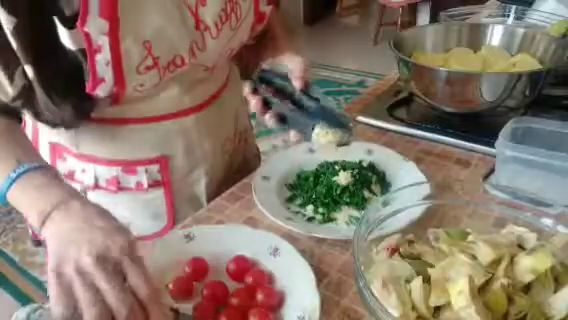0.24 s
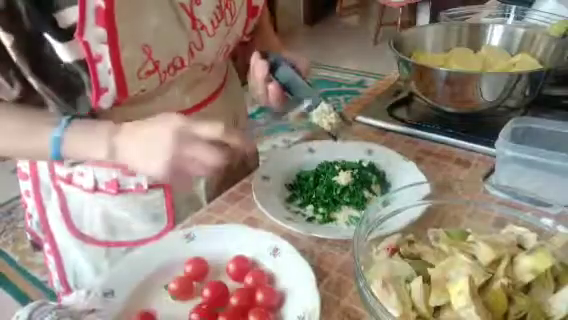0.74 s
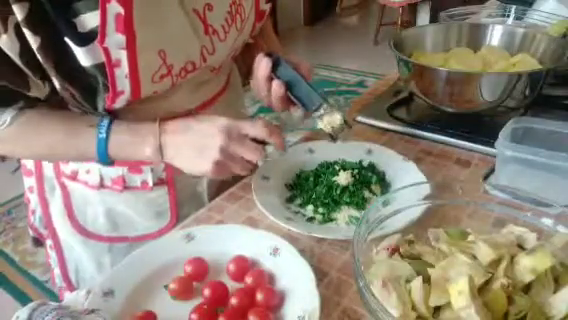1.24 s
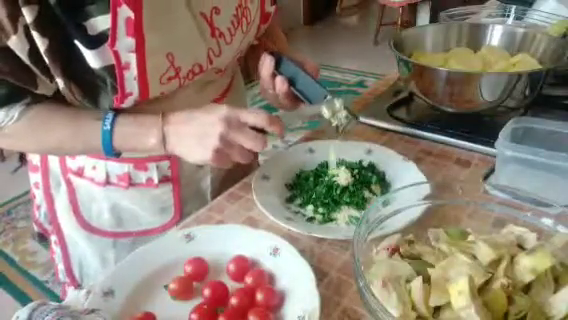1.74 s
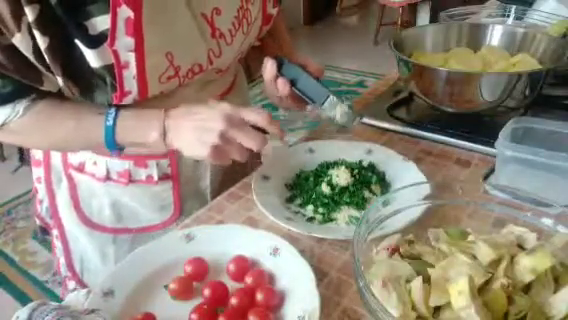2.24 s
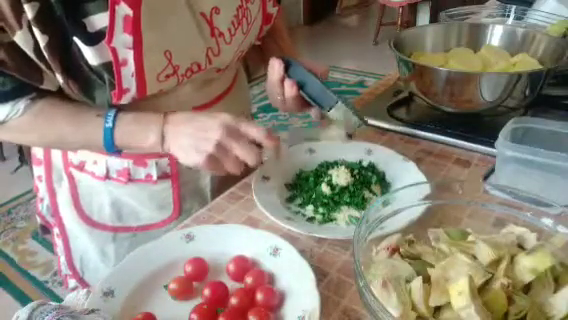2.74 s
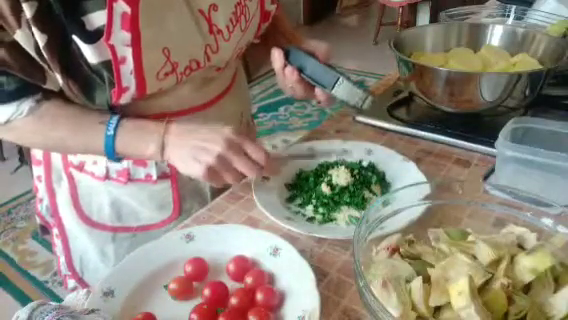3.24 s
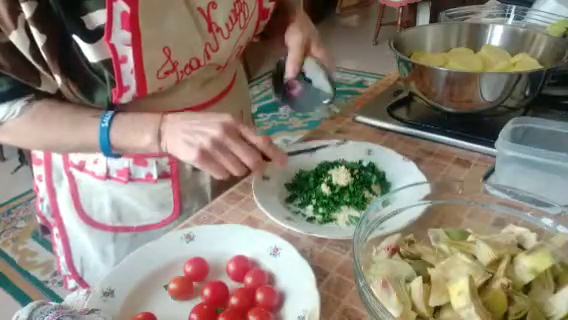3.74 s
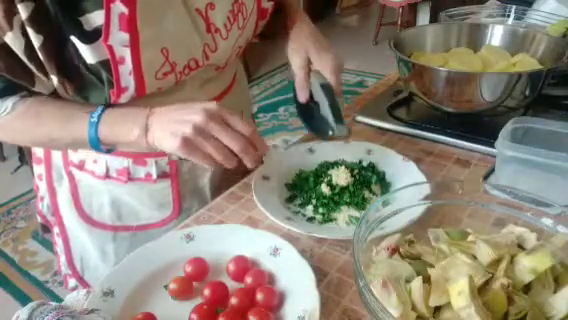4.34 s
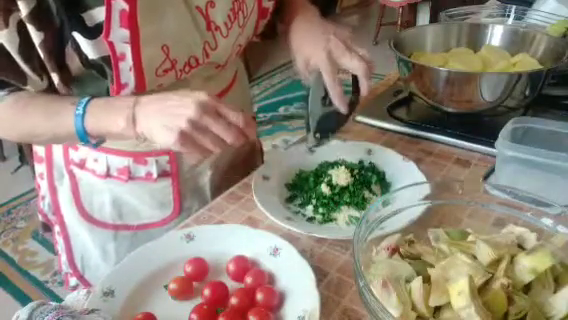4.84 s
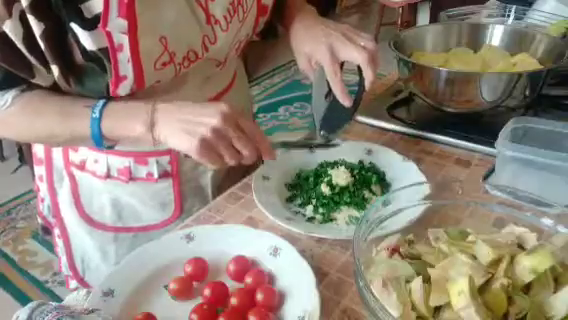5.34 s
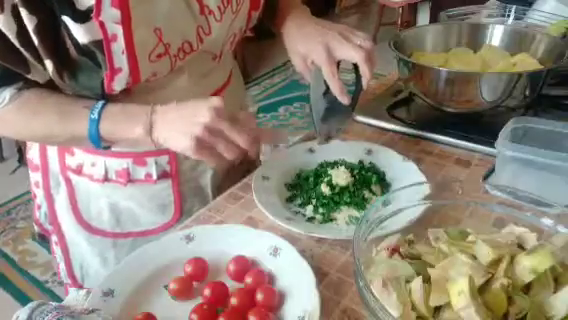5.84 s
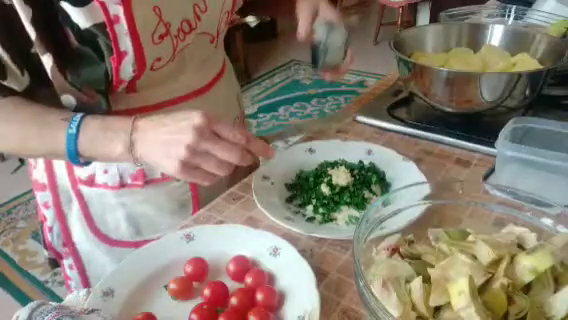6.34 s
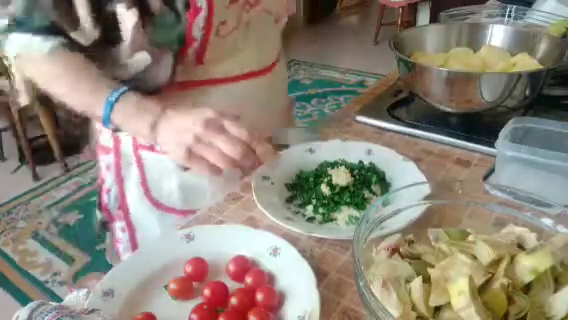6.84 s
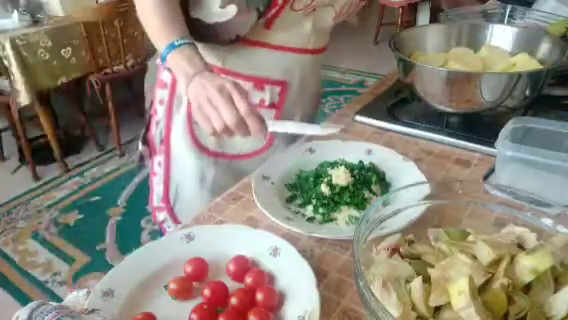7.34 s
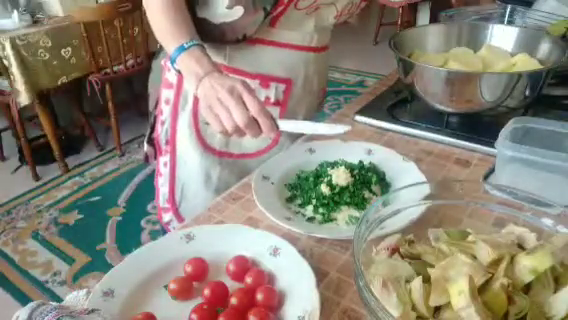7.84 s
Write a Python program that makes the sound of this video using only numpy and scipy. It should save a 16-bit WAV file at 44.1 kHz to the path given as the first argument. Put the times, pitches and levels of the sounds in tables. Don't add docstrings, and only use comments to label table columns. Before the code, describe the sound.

In a quiet tiled kitchen, a knife handle rattles briefly on a ceramic plate. The blade then scrapes a metal garlic press in short gritty strokes with crisp snaps. After a pause come louder, uneven metallic taps, a last scrape, a soft step and a hollow cupboard-like thud with small rebounds. Close stereo microphones, faint low rumble behind.

```python
import sys
import numpy as np
from scipy import signal
from scipy.fft import rfft, irfft, next_fast_len
from scipy.io import wavfile
from scipy.ndimage import uniform_filter1d

SR = 44100
rng = np.random.default_rng(int(sys.argv[2]) if len(sys.argv) > 2 else 0)


def pcm_store(signal):
    levels = np.round(np.clip(np.atleast_2d(signal), -1, 1) * 32767)
    wavfile.write(sys.argv[1], SR, levels.astype(np.int16).T)


def level_to_linear(level):
    exponent = np.asarray(level, float) / 20
    return 10 ** exponent


N = 357210


def evened(x):
    return x / np.sqrt(np.mean(x ** 2) + 1e-20)


def read(points, hz):
    f, value = np.transpose(points)
    return np.interp(np.log(hz + 1), np.log(f + 1), value)


def add(mix, s, sound):
    part = mix[:, round(s * SR):][:, :sound.shape[1]]
    part += sound[:, :part.shape[1]]


def causal(points, size=2048):
    hz = abs(np.fft.fftfreq(size, 1 / SR))
    log_gain = np.log(level_to_linear(np.maximum(read(points, hz), -90)))
    taps = np.fft.ifft(np.exp(np.conj(signal.hilbert(log_gain)))).real
    return taps[:size // 2] / np.linalg.norm(taps)


def ports(x, likeness):
    z = rfft(x)
    same = np.clip(read(likeness, np.fft.rfftfreq(x.shape[1], 1 / SR)), -1, 1)
    right = same * z[0] + np.sqrt(1 - same ** 2) * z[1]
    return irfft([z[0], right], x.shape[1])


# pitch in Hz, likeness from -1 to 1.
BLOW_LIKENESS = [(60, 1), (180, 0.95), (550, 0.56), (1650, -0.063), (4970, -0.047), (15000, 0.033)]


def tilted(x, db_per_octave, centre_hz):
    size = next_fast_len(x.shape[1] + 512)
    hz = np.maximum(np.fft.rfftfreq(size, 1 / SR), centre_hz / 8)
    leaned = irfft(rfft(x, size) * level_to_linear(db_per_octave * np.log2(hz / centre_hz)), size)
    fade = np.clip(np.arange(size)[::-1] / 512 - 1, 0, 1)
    return ports(leaned, BLOW_LIKENESS) * fade


def rings(modes, local, scatter):
    hz, db, t60 = np.tile(np.transpose(modes), 3)[:, :, None]
    t = np.arange(max(round(t60.max() * SR), 1024)) / SR
    hz = hz * (1 + scatter * local.standard_normal(hz.shape))
    strength = level_to_linear(db.T + 2 * local.standard_normal((2, len(hz))))
    start = strength * np.exp(2j * np.pi * local.random((2, len(hz))))
    decaying_tones = np.exp((2j * np.pi * hz - np.log(1000) / t60) * t)
    out = (start @ decaying_tones).real
    out *= 1 - np.exp(-(t * hz.max() / 1.5) ** 2)
    return out / np.linalg.norm(out[0])


def blows(rows, colour, low, high, scatter, rise, centre_hz):
    out, crack = np.zeros((2, N)), causal(colour)
    for (s, db, tilt_db, low_db, high_db, ms), seed in zip(rows, rng.integers(0, 2 ** 31, 64)):
        local = np.random.default_rng(seed)
        t = np.arange(2000) / SR * 1000 / max(ms, .1)
        chatter = local.standard_normal((2, len(t))) * np.exp(-t) * np.minimum(t / max(rise, .01), 1)
        chatter[:, np.argmax(t > rise)] = 1.7
        low_ring = level_to_linear(low_db) * rings(low, local, scatter)
        high_ring = level_to_linear(high_db) * rings(high, local, scatter)
        parts = crack[None], low_ring, high_ring
        body = np.zeros((2, max(part.shape[1] for part in parts)))
        for part in parts:
            add(body, 0, part)
        sound = tilted(signal.fftconvolve(chatter, body, axes=1), tilt_db, centre_hz)
        add(out, s, level_to_linear(db) * 1.56 * sound / abs(sound).max())
    return out


# time in seconds, level in dB.
BUSTLE = [(0.0, 7), (.4, 3.5), (.8, 3), (2.3, 2.5), (2.68, 6), (2.95, 1.5), (3.45, -0.7), (4.3, 1),
          (4.67, -2), (5.03, 1.2), (5.4, -2.5), (5.91, -4.5), (6.3, -1), (7.24, -3.5), (7.6, 2), (8.1, 3.5)]
# pitch in Hz, level in dB per Hz.
WASH_COLOUR = [(150, -31), (250, -6.5), (454, -4), (768, -6), (2240, -12), (6070, -13), (7760, -10.5),
               (11800, -13.5), (15100, -13.5), (16500, -28.5)]
# pitch in Hz, level in dB per Hz.
RUMBLE_COLOUR = [(8.8, -30), (15, 3.5), (27, -4), (48, -5.5), (75, -15), (107, -10.5), (135, -19),
                 (260, -23), (340, -54), (570, -120)]
# pitch in Hz, level in dB.
FRIDGE_HUM = [(102, -64.5)]
# pitch in Hz, likeness from -1 to 1.
NOISE_LIKENESS = [(60, 0.92), (180, 0.79), (550, 0.25), (1650, 0.034), (4970, 0.041), (15000, -0.066)]
RUMBLE_DB, WASH_DB, HISS_DB = -59.5, -75, -70
WASH_FOLLOWS, HISS_FOLLOWS = 0.48, .1
HUM_FADE_DB_PER_S = 1.7


def quiet():
    hop = 512
    frames, hz = N // hop + 5, np.fft.rfftfreq(2048, 1 / SR)
    a, b, c, d, patches = rng.standard_normal((frames, len(hz), 5)).T
    patches = uniform_filter1d(patches, size=12, axis=0)
    patches = evened(uniform_filter1d(patches, size=6, axis=1))
    bustle = np.interp(np.arange(frames) * hop / SR, *np.transpose(BUSTLE))
    rumble = RUMBLE_DB + bustle
    wash = WASH_DB + WASH_FOLLOWS * bustle
    hiss = HISS_DB + HISS_FOLLOWS * bustle
    high = 1 / (1 + np.exp(-4 * (np.log2(hz + 1)[:, None] - 11.3)))
    upper = level_to_linear(read(WASH_COLOUR, hz)[:, None] + (1 - high) * (wash + 4) + high * hiss - 10.5)
    lower = level_to_linear(read(RUMBLE_COLOUR, hz)[:, None] + rumble + 1.5)
    z = np.array([a + 1j * b, c + 1j * d]) * np.hypot(upper, lower) * level_to_linear(1.8 * patches)
    floor = signal.istft(z, nperseg=2048, noverlap=1536)[1][:, :N]
    waver = evened(np.interp(np.arange(N) / N, np.linspace(0, 1, 50), rng.standard_normal(50)))
    hum = np.zeros(N)
    for f, db in FRIDGE_HUM:
        level = level_to_linear(db + 3.5 * waver - HUM_FADE_DB_PER_S * np.arange(N) / SR)
        hum += level * np.sin(2 * np.pi * np.cumsum(f + 2.5 * waver) / SR)
    return ports(floor, NOISE_LIKENESS) + hum


# pitch in Hz, level in dB, time to die away by 60 dB in seconds.
PRESS_LOW_RING = [(595, -21, .035), (1600, -9, 0.025), (2180, -4.5, 0.04), (2870, 3.5, 0.028),
                  (3403, 2, 0.025), (3624, -3.5, .03), (4060, 0, 0.03)]
PRESS_HIGH_RING = [(5630, -0.5, 0.022), (6420, 2, 0.024), (6870, -2.5, 0.028), (7604, 6, 0.03),
                   (8030, -5, 0.043), (8685, 4, 0.038), (10730, -5.5, 0.043), (11730, -2, 0.024)]
# pitch in Hz, level in dB per Hz.
SCRAPE_COLOUR = [(180, -67), (300, -28), (1190, -17.5), (1930, -6.5), (2130, -11.5), (3300, -6.5),
                 (3970, -5.5), (7500, 2), (13000, -8), (15700, -22), (16500, -47.5)]
# moment of top speed
# in seconds, friction level in dB, speed-up in seconds, slow-down in seconds, brightness in dB per octave.
BLADE_STROKES = [(1.029, -54, .035, .04, -3.2), (1.132, -54.5, 0.083, .15, 2.5),
                 (1.276, -51, .045, 0.026, 7), (1.53, -45, 0.14, .045, 6.5),
                 (1.805, -29, 0.047, 0.059, 0.1), (2.083, -23.5, .022, 0.046, 0),
                 (2.306, -26.5, .011, 0.033, -2.5), (2.547, -23.5, 0.028, .027, -1),
                 (2.741, -27.5, 0.023, 0.075, -2.5), (4.372, -52, 0.094, 0.16, 3),
                 (6.077, -18, 0.014, 0.033, 3), (7.206, -48.5, 0.036, .1, -2.5),
                 (7.61, -55.5, .13, .33, -6.5), (4.438, -43.5, .02, .026, -1.2),
                 (6.1, -30.5, .03, .09, 0.5), (.14, -64, .35, 0.54, 0), (6.45, -64, .4, 0.47, 0),
                 (7.88, -61.5, 0.46, .5, -2)]
STROKE_SWING_DB = 25.5


def strokes():
    out, hiss = np.zeros((2, N)), causal(SCRAPE_COLOUR)
    for (top, db, rise, fall, tilt_db), seed in zip(BLADE_STROKES, rng.integers(0, 2 ** 31, 32)):
        local = np.random.default_rng(seed)
        s = max(top - rise, 0), top, top + fall
        t = np.arange(s[0], s[-1], 1 / SR)
        clumps = level_to_linear(0.92 * evened(uniform_filter1d(local.standard_normal(len(t)), 90)))
        sizes = level_to_linear(2.1 * np.minimum(local.exponential(1, len(t)), 4))
        slips = sizes * (local.random(len(t)) < 12000 / SR)
        drive = evened(clumps * slips) * local.standard_normal((2, len(t)))
        speed_db = db - STROKE_SWING_DB * np.interp(t, s, [1, 0, 1])
        drive *= level_to_linear(speed_db) * signal.windows.tukey(len(t), .15)
        body = level_to_linear(-10.5) * rings(np.vstack([PRESS_HIGH_RING, PRESS_LOW_RING]), local, 0.029)
        body[:, :len(hiss)] += hiss
        sound = signal.fftconvolve(drive, body / np.linalg.norm(body[0]), axes=1)
        add(out, s[0], tilted(sound, tilt_db, 7000))
    return out


# time in seconds, peak level in dB, ring strength in dB.
RIM_CLINKS = [
    (0.285, -25, 3),
    (0.307, -31, 4),
    (0.331, -27.5, -0.5),
    (0.34, -28.5, -2),
    (0.382, -33, -1.5),
    (0.77, -54.5, -7),
    (0.89, -54, -2.2),
]
# pitch in Hz, level in dB, time to die away by 60 dB in seconds.
PLATE_RING = [(563, -3.5, 0.062), (609, 3.5, 0.064), (699, -2, 0.067), (808, 0, 0.089), (900, -9, 0.059),
              (1290, -14, 0.089), (1430, -3, 0.059)]
BLADE_RING = [(2143, -1, 0.12), (3160, 0, 0.094), (3830, -8, 0.066), (4220, -4.5, 0.067),
              (5150, -11.5, 0.06), (5740, -12, .05), (6900, -13, .04)]
# pitch in Hz, level in dB per Hz.
CLINK_COLOUR = [(120, -48), (200, -17.5), (671, 3), (2610, -10), (4270, -18), (7010, -16), (8900, -48),
                (10100, -27), (16000, -88)]
PLATE_DB, BLADE_DB, CLINK_MS = 8, 2.5, 3.26
CLINK_LEAN_DB = 0.32


def clinks():
    rows = [(s, db, CLINK_LEAN_DB * ring, PLATE_DB + ring, BLADE_DB + ring / 2, CLINK_MS)
            for s, db, ring in RIM_CLINKS]
    return blows(rows, CLINK_COLOUR, PLATE_RING, BLADE_RING, 0.0059, 0.3, 1500)


# time in seconds, peak level in dB, lean in dB per octave
# (flat blow down, edge blow up), shift of the ring towards high tones in dB.
PRESS_TAPS = [(0.9177, -40, -4.5, 1), (1.471, -37.5, -2.4, -8), (1.737, -26.5, -1.5, -3),
              (2.0203, -37, -1.1, -2), (2.0251, -25, -1.5, 0), (2.2837, -30, -1.5, -2),
              (2.4825, -19, -0.1, 4.5), (2.7036, -19, -1.1, 0.5), (2.7453, -12, 0.8, 1.7),
              (4.182, -14.5, -.9, -1.2), (4.36, -42.5, 1.5, -4), (4.376, -36.5, 3, 10),
              (4.4344, -33.5, -1.1, -3.5), (4.9215, -8, -.7, -1.5), (4.985, -21.5, 0.5, -3),
              (5.3496, -11.5, 2.9, 0.3), (5.3548, -13.5, -0.9, -1.7), (5.408, -13, 1.5, 1.2),
              (5.5356, -5, -0.5, 0.5), (5.7034, -10, -2, -4.5), (5.877, -10, -1.3, 0),
              (5.905, -18, 3, -1.3), (6.0502, -7, 2, 3), (6.0764, -11, 1.5, 4.5), (6.118, -13, 1.9, 3.5)]
# time in seconds, peak level in dB, lean in dB per octave, shift towards high tones in dB.
RIDGE_SNAPS = [
    (1.8021, -22.5, 6, -9),
    (2.3079, -8.5, 0.3, 7),
    (2.5487, -11.5, -0.1, 7.5),
    (2.5529, -12.5, 0, -2),
    (2.754, -16.5, 0.3, .4),
    (2.7692, -11, -0.5, -1.5),
    (2.774, -12.5, 1.5, 4.5),
    (5.413, -6.5, 1.5, -1),
]
# pitch in Hz, level in dB per Hz.
CRACK_COLOUR = [(180, -42.5), (300, -34.5), (1130, -23.5), (2400, -14.5), (2890, -9), (4930, -8.5),
                (5550, -6), (6900, -4), (7760, -4.5), (15400, -19.5), (16500, -45.5)]
PRESS_LOW_DB, PRESS_HIGH_DB, HIGH_FOLLOWS = -9.5, -6.5, .6
TAP_MS, FLAT_EXTRA_MS, SNAP_MS = 2.2, .3, 0.66


def knocks():
    s, db, lean, shift = np.transpose(list(PRESS_TAPS) + list(RIDGE_SNAPS))
    is_tap = np.arange(len(s)) < len(PRESS_TAPS)
    ms = np.where(is_tap, TAP_MS - FLAT_EXTRA_MS * lean, SNAP_MS)
    low_db = PRESS_LOW_DB - shift
    high_db = PRESS_HIGH_DB + HIGH_FOLLOWS * shift
    rows = np.transpose([s, db + .3, lean, low_db, high_db, ms])
    return blows(rows, CRACK_COLOUR, PRESS_LOW_RING, PRESS_HIGH_RING, 0.028, 0.16, 6100)


# start in seconds, grip, hold and release in seconds, level in dB.
SOFT_RUBS = [
    (1.109, 0.035, 0.23, .09, -68),
    (6.299, 0.14, 0.033, .16, -65.5),
    (7.6, .12, .2, .15, -68),
]
# pitch in Hz, width in Hz, level in dB.
RUB_HOLLOWS = [
    [(657, 98, -3), (1450, 91, -5), (1630, 88, -3)],
    [(600, 300, -4), (900, 170, 0), (1870, 1200, -8)],
    [(11100, 500, 1), (12200, 900, -4)],
]
RUB_SWING_DB = 13


def rubs():
    out, hz, t = np.zeros((2, N)), np.fft.rfftfreq(SR, 1 / SR), np.arange(SR) / SR
    for (s, grip, hold, release, db), body in zip(SOFT_RUBS, RUB_HOLLOWS):
        ends = np.cumsum([0, grip, hold, release])
        shape = sum(level_to_linear(level_db) / (1 + (2 * (hz - f) / width) ** 2) for f, width, level_db in body)
        noise = evened(irfft(rfft(rng.standard_normal((2, SR))) * shape, SR))
        level = level_to_linear(db - RUB_SWING_DB * np.interp(t, ends, [1, 0, 0, 1])) * (t < ends[-1])
        add(out, s, ports(noise, NOISE_LIKENESS) * level)
    return out


# time in seconds, peak level in dB, lean in dB per octave.
FOOTSTEP = [
    (6.794, -46.5, -1.5),
    (6.825, -42, -8.5),
]
# time in seconds, peak level in dB.
DOOR_THUDS = [
    (7.384, -12.5),
    (7.411, -18),
    (7.444, -29),
    (7.49, -31.5),
    (7.555, -30),
    (7.595, -31.5),
    (7.65, -37.5),
]
# pitch in Hz, level in dB, time to die away by 60 dB in seconds.
BOOM_RING = [(100.5, -0.5, 0.28), (159.6, 5.5, 0.22), (201, 2.5, 0.2), (271, -2.5, 0.13)]
PANEL_RING = [(361, -6, 0.11), (570, 1.5, 0.08), (607, .6, .07), (645, 1.5, 0.073), (767, -3.5, 0.059),
              (890, -3, 0.054), (1100, 1.5, 0.055)]
# pitch in Hz, level in dB per Hz.
THUD_COLOUR = [(29, -30), (50, -1.5), (114, -3), (507, -6), (572, 1.5), (694, -1.5), (765, -5), (1620, -14),
               (2560, -26), (7210, -33.5), (16000, -60)]
STEP_BOOM_DB, STEP_PANEL_DB = -2.5, -28
BOOM_DB, BOOM_GROWTH, PANEL_DB, THUD_MS = -10, 0.31, -8, 11.9
THUD_LEAN_DB, DULLING = 1.74, 0.065


def thuds():
    rows, first_db = [], DOOR_THUDS[0][1]
    for s, db in DOOR_THUDS:
        lost = first_db - db
        rows.append((s, db, THUD_LEAN_DB - DULLING * lost, BOOM_DB + BOOM_GROWTH * lost, PANEL_DB, THUD_MS))
    for s, db, lean in FOOTSTEP:
        rows.append((s, db, lean, STEP_BOOM_DB, STEP_PANEL_DB, THUD_MS))
    return blows(rows, THUD_COLOUR, BOOM_RING, PANEL_RING, 0.015, 0.182, 500)


# pitch in Hz, time to die away by 60 dB in seconds.
KITCHEN_ECHO = [(100, 0.61), (500, 0.46), (2000, 0.28), (6000, 0.24), (12000, 0.21)]
HALL_DB, HALL_LONGER = -18.5, 2.54


def kitchen(x):
    taps = np.zeros((2, SR))
    slots = np.arange(240, SR - 12, 12)
    at = slots + rng.integers(0, 12, (2, len(slots)))
    np.put_along_axis(taps, at, rng.choice([-1., 1.], at.shape), 1)
    hz, t, z = signal.stft(taps, SR, nperseg=256)
    fade_db = -60 * t / read(KITCHEN_ECHO, hz)[:, None]
    fade = np.hypot(level_to_linear(fade_db), level_to_linear(HALL_DB + fade_db / HALL_LONGER))
    tail = signal.istft(z * fade, SR, nperseg=256)[1][:, :SR]
    tail = ports(tail / np.linalg.norm(tail[0]), BLOW_LIKENESS)
    return signal.fftconvolve(x[::-1], tail, axes=1)[:, :N]


def scene():
    near = knocks() + strokes() + clinks()
    door = level_to_linear(-2.5) * thuds()
    room = kitchen(level_to_linear(-11.0) * near + level_to_linear(-5.0) * door)
    return near + door + room + rubs() + quiet()


def roll_off(x):
    return signal.sosfilt(signal.butter(12, 16800, fs=SR, output="sos"), x)


# pitch in Hz, left minus right in dB.
PORT_DIFFERENCE = [(60, 0), (110, 0), (200, -2.5), (380, -1), (700, -1.5), (1290, -1.5), (2380, -4),
                   (4400, -4), (8120, -7), (15000, 1.5)]


def record(dry):
    hz = np.fft.rfftfreq(N, 1 / SR)
    lean_db = read(PORT_DIFFERENCE, hz) + np.clip(np.linspace(0, 30, N // 2 + 1), 0, 2.5)
    x = irfft(rfft(dry) * level_to_linear([lean_db / 2, -lean_db / 2]), N)
    x = np.clip(x, -1, 1)
    band_edge = level_to_linear(-24 * (hz > 15950)) * (hz < 16650)
    x = irfft(rfft(x) * band_edge, N)
    return roll_off(x)


dry = scene()
out = record(dry)
pcm_store(out)
```